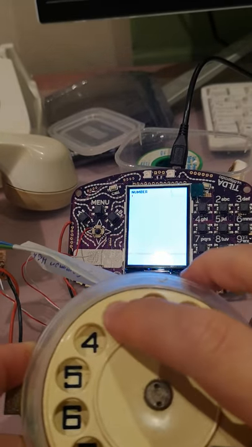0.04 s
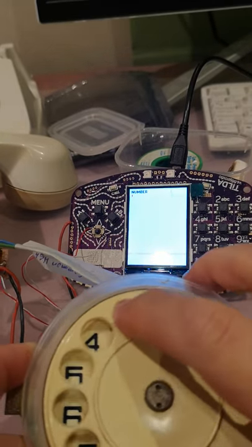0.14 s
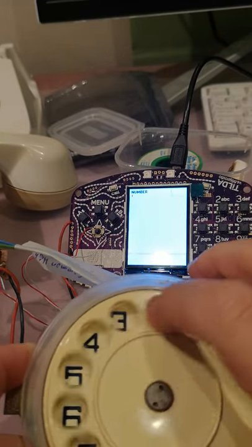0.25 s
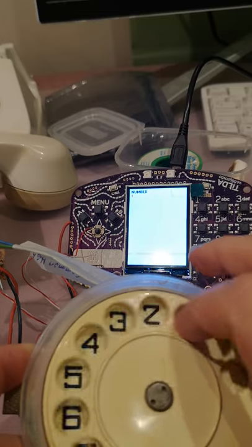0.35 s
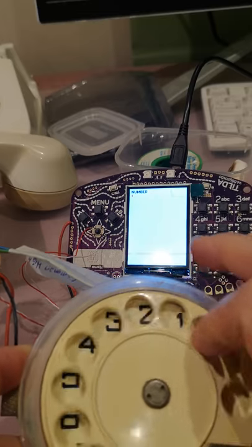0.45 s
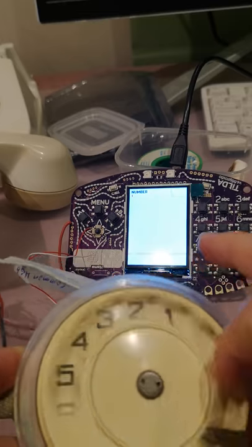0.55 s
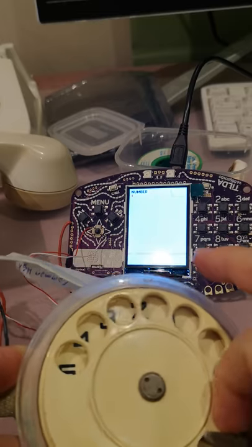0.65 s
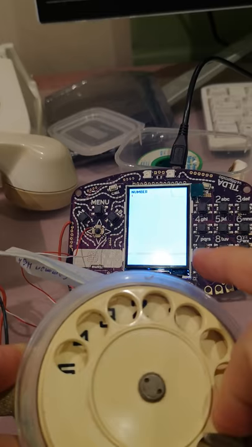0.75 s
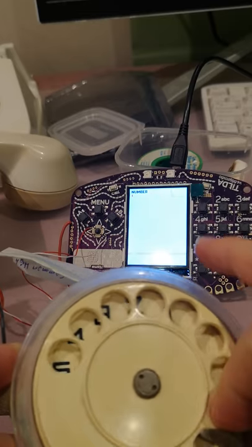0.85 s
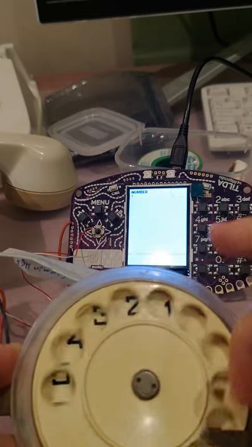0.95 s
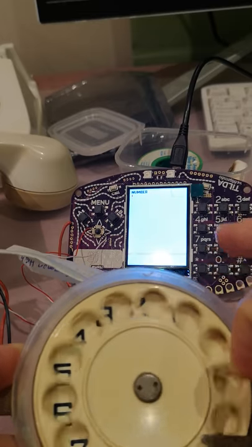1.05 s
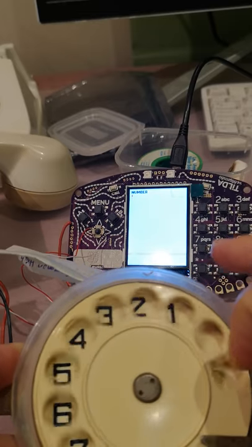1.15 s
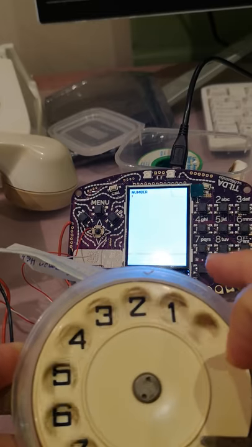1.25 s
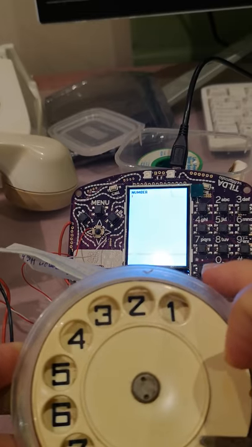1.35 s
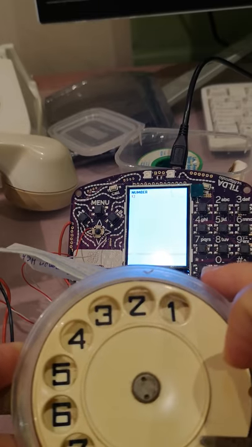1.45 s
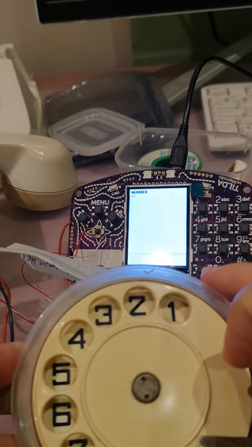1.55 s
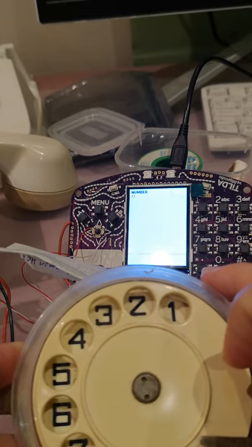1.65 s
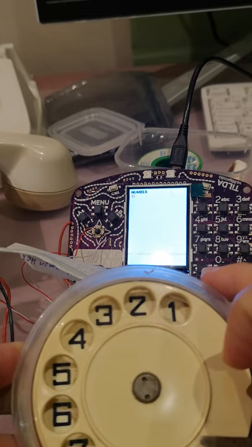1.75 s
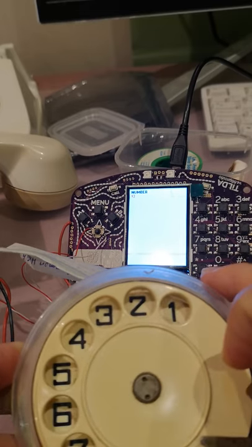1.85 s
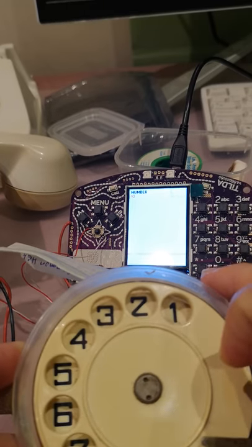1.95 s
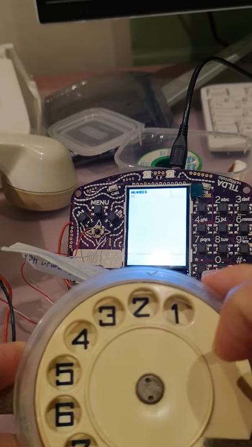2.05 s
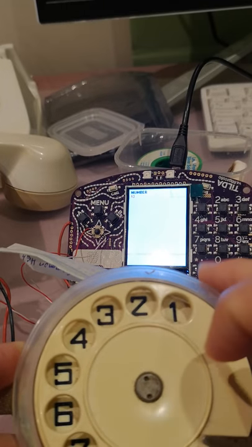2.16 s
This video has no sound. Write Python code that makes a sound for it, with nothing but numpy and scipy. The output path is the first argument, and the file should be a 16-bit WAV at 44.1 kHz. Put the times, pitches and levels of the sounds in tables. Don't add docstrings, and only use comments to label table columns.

```python
import sys
import numpy as np
from scipy import signal
from scipy.fft import rfft, irfft
from scipy.io import wavfile
from scipy.ndimage import uniform_filter1d

SR = 44100
rng = np.random.default_rng(int(sys.argv[2]) if len(sys.argv) > 2 else 0)


def unload_wav(signal):
    wavfile.write(
        sys.argv[1],
        SR,
        np.round(np.clip(np.atleast_2d(signal).T, -1, 1) * 32767).astype(np.int16),
    )


def boost_factor(decibels):
    exponent = np.asarray(decibels, float) / 20
    return 10 ** exponent


N = 97020


def curve(table):
    return np.interp(np.arange(N) / SR, *np.array(table, float).T)


def by_hz(table):
    hz, value = np.array(table, float).T
    return np.interp(np.log(np.fft.rfftfreq(N, 1 / SR) + 1), np.log(hz), value)


def unit(x):
    return x / np.sqrt(np.mean(x ** 2))


def walk(rate_hz):
    k = int(SR / rate_hz)
    steps = np.repeat(rng.standard_normal(N // k + 1), k)
    return unit(uniform_filter1d(uniform_filter1d(steps, k), k)[:N])


def highpass(x, order, hz):
    return signal.sosfilt(signal.butter(order, hz, "high", fs=SR, output="sos"), x)


def lowpass(x, order, hz):
    return signal.lfilter(*signal.butter(order, hz, fs=SR), x)


def ring(x, modes):
    out = 0
    for hz, db, t60_s in modes:
        pole = np.exp(2j * np.pi * hz / SR - np.log(1000) / (t60_s * SR))
        out = out + boost_factor(db) * signal.lfilter([1], [1, -pole], x).imag
    return out


def place(times_s, shapes):
    length = shapes.shape[-1]
    x = np.zeros(shapes.shape[1:-1] + (N + length,))
    for s, shape in zip(times_s, shapes):
        i = int(s * SR)
        x[..., i:i + length] += shape
    return x[..., :N]


def grit(shape, spread_db):
    return rng.standard_normal(shape) * boost_factor(spread_db * rng.standard_normal(shape))


def pair(shared, own):
    own = 0.22 * (own + 2.91 * np.diff(own, prepend=0, axis=-1))
    return np.stack([shared + own, shared - own], axis=-2)


# pitch_hz, density_db_per_hz
AIR_SPECTRUM = [(30, 2.5), (130, 0.5), (230, -4.5), (420, -20), (700, -25), (2000, -25), (4000, -33),
                (16000, -46)]
# time_s, gain_db
RECORDER_GAIN = [(0, 11), (.4, 12), (1.1, 9.5), (1.38, 10.5), (1.5, 5), (1.7, 1), (2.2, 1.5)]
# time_s, level_db
HAND_RUMBLE = [(0, -48.5), (.4, -45.5), (1.1, -47.5), (1.6, -47.5), (1.8, -56.5)]
HUM_HZ, HUM_DB, HUM_WOBBLE_DB, HUM_DRIFT = 190.6, -69.5, 4, 0.0037
HISS_FROM_HZ, HISS_SHARE = 500, 0.19


def background():
    mid, side = irfft(rfft(rng.standard_normal((2, N))) * boost_factor(by_hz(AIR_SPECTRUM)), N)
    side = signal.lfilter(*signal.butter(1, 798, "high", fs=SR), side)
    air = unit(mid + side * np.array([[1], [-1]])) * boost_factor(-65 + 0.5 * walk(8.2))
    bass = signal.sosfiltfilt(signal.butter(2, HISS_FROM_HZ, fs=SR, output="sos"), air)
    gain_db = curve(RECORDER_GAIN)
    hiss = (air - bass) * boost_factor(2.5 + HISS_SHARE * gain_db)
    phase = np.cumsum(2 * np.pi * HUM_HZ * (1 + HUM_DRIFT * walk(21)) / SR)
    hum = np.sin(phase) * boost_factor(HUM_DB + HUM_WOBBLE_DB * walk(54))
    hand_band = signal.butter(3, (12, 28), "band", fs=SR, output="sos")
    hand = unit(signal.sosfilt(hand_band, rng.standard_normal(N)))
    return hiss + (bass + hum) * boost_factor(gain_db) + hand * boost_factor(curve(HAND_RUMBLE) + 2 * walk(20))


# time_s, peak_db, plate_ring_db, spring_ring_db
TOUCHES = [
    (.004, -55, -18, -12),
    (.182, -69, 0, -32),
    (.192, -55, -11, -35),
    (.688, -52.5, 10.5, 5),
    (0.936, -68, 3, 11.5),
]
WIND_TICKS = [(0.2102, -27.5, -48, -6.5), (0.2362, -26, -41, -9), (0.2535, -29, -55, -2.5),
              (0.2748, -26, -50, -23), (0.2875, -37.5, -4.5, 6.5), (0.304, -22.5, -21, -10.5),
              (0.3133, -26.5, -12.5, -7), (0.3269, -23, -16.5, -15), (0.3364, -26.5, -66, -2),
              (0.3523, -29, -26, -4.5), (0.365, -37.5, -3.5, 7.5), (0.3803, -25.5, -39, -3.5),
              (0.392, -26, -11.5, -14), (0.3997, -36, -33, -5.5), (0.415, -39.5, -16, 5.5),
              (0.4204, -27, -36, -5.5), (0.4349, -24, -28.5, -10), (0.4502, -38.5, -80, -1),
              (0.4635, -31, -11, 1.5), (0.478, -22, -44.5, -11.5), (0.5055, -27.5, -15.5, -2),
              (0.5152, -20.5, -41.5, -12), (0.5402, -24, -23.5, -3.5), (0.5489, -27, -25.5, -4.5),
              (0.5682, -27, -20, -5.5), (0.576, -25, -7.5, -12), (0.5909, -29.5, -21, 6),
              (0.596, -27, -8.5, -7), (0.606, -22.5, -20.5, -8.5), (0.6106, -24.5, -16.5, -5.5)]
JAM = [
    (.6195, -22.5, -6.5, -6),
    (0.628, -23, -4, -6),
    (0.634, -26, -10.5, -2.5),
    (.639, -20.5, -8.5, -7),
    (0.644, -20, -10.5, -9.5),
    (.648, -26.5, -2.5, -15.5),
]
RELEASE_AND_STOP = [
    (0.9499, -29, -8, -20.5),
    (0.9528, -27, -5, -12.5),
    (1.4104, -29.5, -26.5, -5),
]
LATE_TICKS = [(0.657, -31.5, -25, -2), (0.7059, -27.5, -16.5, -2.5), (0.9976, -38.5, -12, -4),
              (1.0107, -45, -17.5, 6), (1.0235, -37, -36, -14), (1.0345, -29, -37, -2),
              (1.1999, -27.5, -5.5, -29), (1.2811, -26, -11, -32), (1.0833, -34, -4, -15.5),
              (1.123, -35.5, 0, 0.5), (1.1465, -34, 0, -9), (1.2468, -39, -2.5, -8),
              (1.2957, -39.5, -5, -5.5), (1.3145, -35.5, -6, -2.5), (1.366, -39.5, 3.5, -13.5),
              (1.3927, -36, -8, -16), (1.4311, -24.5, -18.5, -3), (1.442, -26, -8.5, -8.5),
              (1.4571, -25.5, -11, -4.5), (1.4702, -20.5, -14, -10), (1.488, -23.5, -21.5, -5),
              (1.5049, -20.5, -14.5, -8.5), (1.5262, -26.5, -14.5, 0), (1.5466, -23.5, -8, -7),
              (1.5746, -24.5, -18, -7), (1.6091, -23.5, -10, -5)]
# pitch_hz, level_db, t60_s
PAWL = [(3448, -8.5, 0.018), (3595, -5, 0.012), (4086, -8.5, 0.0062), (4576, -7.5, 0.0057),
        (5420, -19.5, 0.0049), (6200, -20.5, .004)]
FREE_PLATE = [(2910, 0, .033), (3600, -3, .018), (3550, -24, .12)]
HELD_PLATE = [(3016, 0.5, 0.012), (2703, -4, .009)]
SPRING = [(7187, 0.5, 0.0083), (7680, 8, 0.0051), (8470, -11, 0.0072), (9180, -11, 0.02),
          (11500, -27, 0.0054), (14900, -19, 0.0023)]
HOUSING = [(760, -41, 0.014), (1115.4, -1, 0.024), (1260, -1, 0.0075), (1556, 2, 0.007),
           (1904, -3.5, 0.0085), (2300, -3.5, 0.0058), (2700, 3.5, .012)]
HELD_FROM_S, FREE_FROM_S = 0.3, 1.42
CHATTER_RISE_S, CHATTER_HOLD_S, CHATTER_FALL_S, CHATTER_SPREAD_DB = 0.0012, 0.001, 0.002, 0.3
TICK_COLOUR_DB, TICK_BODY_DB = 2, -18.5


def to_peak(x, peak_db):
    peak = np.abs(x.mean(axis=1)).max(axis=1)
    return x * (boost_factor(peak_db) / peak)[:, None, None]


def ticks():
    events = TOUCHES + WIND_TICKS + JAM + RELEASE_AND_STOP + LATE_TICKS
    s, db, plate_db, spring_db = np.array(events, float).T
    t = np.arange(1800) / SR
    fall_s = np.maximum(t - CHATTER_RISE_S - CHATTER_HOLD_S, 0)
    env = np.minimum(t / CHATTER_RISE_S, 1) * np.exp(-fall_s / CHATTER_FALL_S)
    shared, own, uneven = rng.standard_normal((3, len(s), len(t)))
    chatter = pair(shared, own) * (env * boost_factor(CHATTER_SPREAD_DB * uneven))[:, None]
    held = (s > HELD_FROM_S) & (s < FREE_FROM_S)
    free = s > FREE_FROM_S
    parts = ((PAWL, db + 1.5 - 3 * free),
             (FREE_PLATE, db + plate_db + 11 - 99 * held),
             (HELD_PLATE, db + plate_db + 8 - 99 * ~held),
             (SPRING, db + spring_db + 2))
    out = 0
    for modes, level_db in parts:
        part = 0
        for mode in modes:
            colour = boost_factor(TICK_COLOUR_DB * rng.standard_normal((len(s), 1, 1)))
            part = part + colour * ring(chatter, [mode])
        out = out + to_peak(part, level_db)
    body = to_peak(ring(chatter, HOUSING[1:]), db + TICK_BODY_DB - 6.7 * free)
    start_s = s - 0.0008
    return highpass(place(start_s, out), 4, 2450) + place(start_s, body)


# start_s, level_db, contact_s, long_ring_db
KNOCKS = [
    (.182, -48, 0.00083, -28),
    (0.84, -67, .0003, -37),
    (0.952, -30, 0.00022, 1),
    (0.956, -27, 0.00057, -30),
    (1.412, -18, 0.000098, -35.5),
]
# pitch_hz, level_db, t60_s
LONG_RING = [(1169, -1, 0.24), (1452, -11.5, .09), (2266, -12.5, .1)]
RING_SWELL_S = 0.0096


def knocks():
    s, db, contact_s, ring_db = np.array(KNOCKS, float).T[:, :, None]
    t = np.arange(100) / SR
    push = np.sin(np.pi * np.minimum(t / contact_s, 1)) / (contact_s * SR) * boost_factor(db)
    build = np.hanning(int(RING_SWELL_S * SR) * 2)
    n = len(build)
    swell = 2 * build / build.sum() * np.cos(2 * np.pi * LONG_RING[0][0] * np.arange(n) / SR)
    swell = swell + grit(n, 2) / n
    long_push = np.convolve(place(s[:, 0], push * boost_factor(ring_db)), swell)[:N]
    return ring(place(s[:, 0], push), HOUSING) + ring(long_push, LONG_RING)


GRIT_DB, RUB_PER_S, RUB_PATCHY_DB = 2, 4000, 3
# pitch_hz, level_db, t60_s
MOVING_PLATE = [(2830, -1, 0.0049), (2395, -3, 0.007), (3320, -5, .006)]


def rub(table, mix_db):
    contacts = grit((2, N), GRIT_DB) * (rng.random((2, N)) < RUB_PER_S / SR)
    x = pair(*contacts)
    out = 0
    for db, modes in zip(mix_db, (HOUSING, MOVING_PLATE, PAWL, SPRING[:-1])):
        out = out + boost_factor(db + RUB_PATCHY_DB * walk(70)) * unit(ring(x, modes))
    return out * boost_factor(curve(table))


# time_s, level_db
WIND_RUB = [(.2, -111), (.26, -57.5), (.4, -57), (.6, -61.5), (.65, -53), (.67, -58.5), (.72, -60.5),
            (.76, -108)]


def wind_rub():
    return rub(WIND_RUB, mix_db=(7, -15.5, 6, 4))


# start_s, length_s, level_db, body_db
RATTLES = [(0.613, 0.036, -38, -1.5), (1.029, .015, -39.5, 6.5), (1.044, 0.012, -34, -0.5),
           (1.069, 0.015, -34, -1), (1.082, 0.016, -30, -6.5), (1.113, 0.019, -34.5, -3),
           (1.13, 0.0167, -31, -4.5), (1.151, 0.036, -40.5, -5.5), (1.191, 0.017, -34.5, -20),
           (1.232, 0.029, -37, -11), (1.287, .018, -35, -6.5), (1.306, 0.0085, -41, -14),
           (1.329, 0.025, -39, -23), (1.362, 0.013, -37.5, -16), (1.375, 0.021, -37.5, -14),
           (1.395, 0.01, -33.5, -24)]
RATTLE_GAP_S, RATTLE_JITTER, RATTLE_FUZZ_DB = 0.0038, 0.3, -2


def rattles():
    taps = 600
    times_s = np.cumsum(RATTLE_GAP_S * np.exp(RATTLE_JITTER * rng.standard_normal(taps)))
    shared, own = rng.standard_normal((2, taps, 40))
    tap_level = boost_factor(1.5 * rng.standard_normal((taps, 1, 1)))
    shapes = pair(shared, own) * np.hanning(40) * tap_level
    fuzz = unit(pair(*grit((2, N), GRIT_DB)))
    x = unit(place(times_s[times_s < N / SR], shapes)) + boost_factor(RATTLE_FUZZ_DB) * fuzz
    x = x / np.std(ring(x, SPRING))
    t = np.arange(N) / SR
    spring_gate = body_gate = 0
    for s, length_s, db, body_db in RATTLES:
        run = np.clip(np.minimum(t - s + 0.001, s + length_s - t) / 0.003, 0, 1)
        spring_gate = spring_gate + boost_factor(db) * run
        body_gate = body_gate + boost_factor(db + body_db) * run
    return ring(x * spring_gate, SPRING[:-1]) + ring(x * body_gate, MOVING_PLATE + PAWL)


# time_s, level_db
RETURN_RUB = [(.96, -71), (1.0, -38.5), (1.025, -39.5), (1.04, -32), (1.06, -34), (1.085, -32),
              (1.105, -32.5), (1.13, -34.5), (1.155, -33), (1.2, -32), (1.225, -33.5), (1.25, -32.5),
              (1.3, -28.5), (1.35, -30.5), (1.4, -34), (1.5, -37.5), (1.6, -51.5), (1.63, -77)]


def whirr():
    return lowpass(rub(RETURN_RUB, mix_db=(-9.5, -16.5, -18.5, -18)) + rattles(), 2, 11100)


# start_s, peak_db, pitch_hz, length_s
SQUEAKS = [(1.026, -36.5, 1120, .014), (1.038, -40, 1064, .012), (1.067, -39, 1050, .012),
           (1.088, -50, 1070, .016), (1.134, -38.5, 1030, .018), (1.184, -42, 1190, .014),
           (1.227, -30.5, 1096, .013), (1.248, -36.5, 1257, .01), (1.274, -40, 1030, .012),
           (1.3, -34, 1043, .02), (1.322, -38.5, 953, .018), (1.327, -44, 1150, .012),
           (1.369, -33, 1070, .012), (1.39, -43.5, 1100, .01)]
SQUEAK_WOBBLE = 0.015


def squeaks():
    s, db, hz, length_s = np.array(SQUEAKS, float).T[:, :, None]
    t = np.arange(1500) / SR
    wobble = 10 * uniform_filter1d(rng.standard_normal((len(s), len(t))), size=100, axis=1)
    tone = np.sin(np.cumsum(2 * np.pi * hz * (1 + SQUEAK_WOBBLE * wobble) / SR, axis=1))
    swell = np.sin(np.pi * np.minimum(t / length_s, 1))
    return place(s[:, 0], boost_factor(db) * tone * swell)


ROOM_T60_S, ROOM_DB, ROOM_TOP_HZ = 0.14, -14, 7400


def room(dial):
    t = np.arange(SR // 2) / SR
    tail = rng.standard_normal((2, len(t))) * boost_factor(-60 * t / ROOM_T60_S) * np.minimum(t / 0.012, 1)
    tail = lowpass(tail, 1, ROOM_TOP_HZ)
    return boost_factor(ROOM_DB) * signal.fftconvolve(dial, tail / np.linalg.norm(tail[0]), axes=1)[:, :N]


# pitch_hz, left_minus_right_db
PORT_PAN = [(400, -1), (1300, -1), (2400, 3.5), (4400, 9), (8000, 3), (15000, -2)]
# pitch_hz, left_lead_rad
PORT_PHASE = [(500, 1.8), (1500, 0.79), (3500, 0.93), (8000, 2.11)]
# pitch_hz, level_db
TREBLE_COLOUR = [(9500, -1), (11500, -9), (13500, -5.5), (15000, -2.5), (16200, -17.5), (16600, -60.5)]


def two_ports(x):
    half = boost_factor(by_hz(PORT_PAN) / 2) * np.exp(0.5j * by_hz(PORT_PHASE))
    return irfft(rfft(x) * np.array([half, 1 / half]) * boost_factor(by_hz(TREBLE_COLOUR)), N)


def scene():
    dial = ticks() + knocks() + wind_rub() + whirr() + squeaks()
    dial = highpass(dial, 4, 900)
    return background() + two_ports(dial + room(dial))


def top_cut(x):
    return signal.sosfilt(signal.butter(12, 16510, fs=SR, output="sos"), x)


def record(dry):
    return top_cut(dry)


dry = scene()
out = record(dry)
unload_wav(out)
```